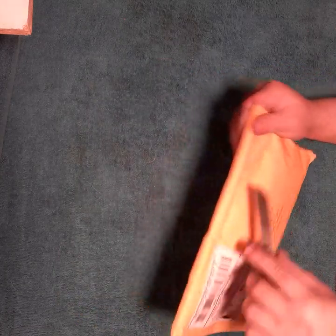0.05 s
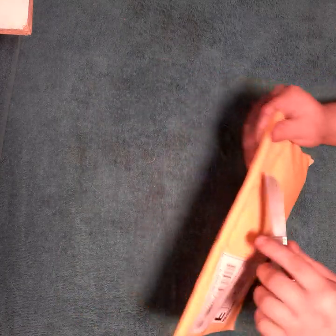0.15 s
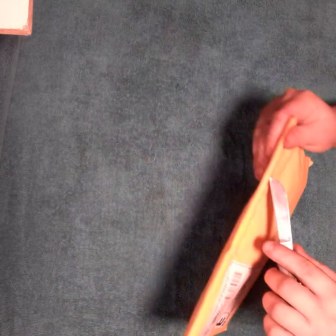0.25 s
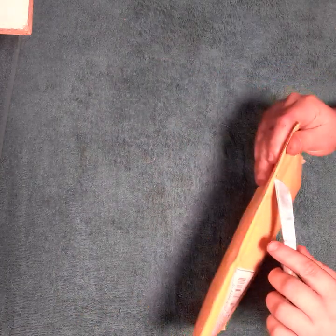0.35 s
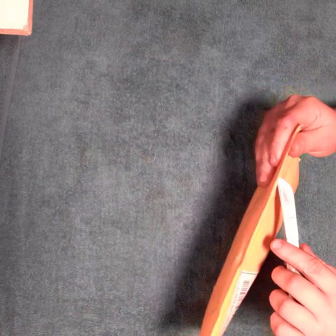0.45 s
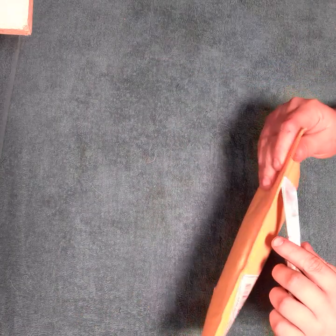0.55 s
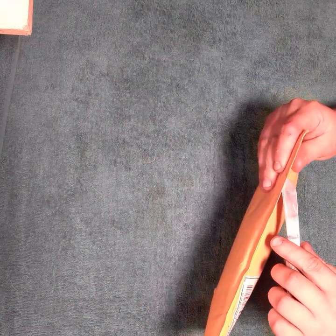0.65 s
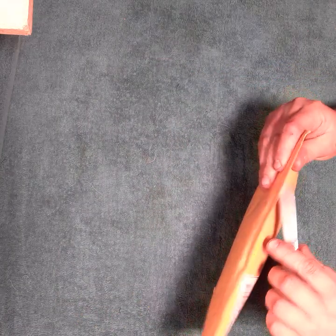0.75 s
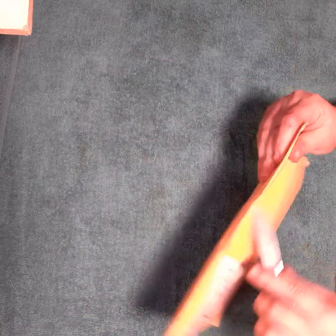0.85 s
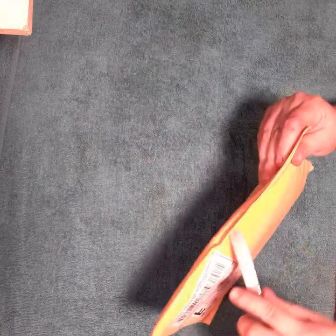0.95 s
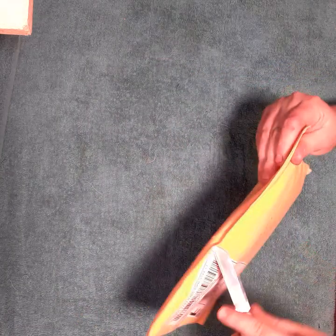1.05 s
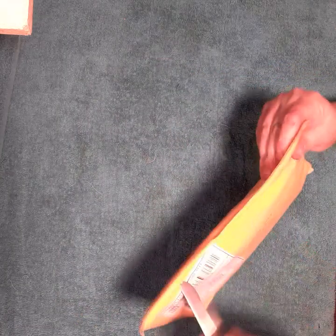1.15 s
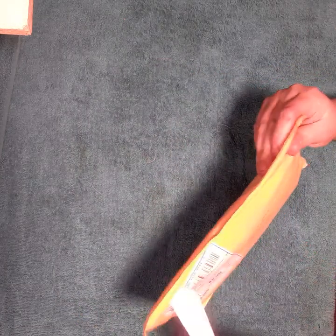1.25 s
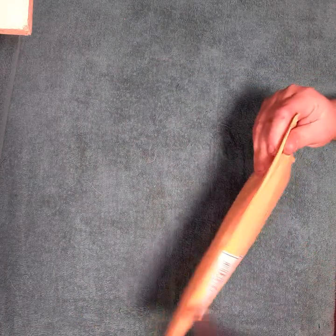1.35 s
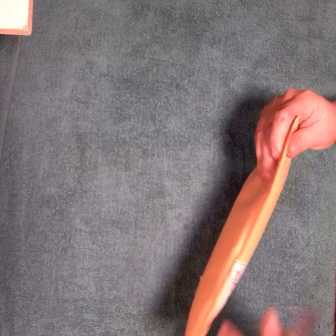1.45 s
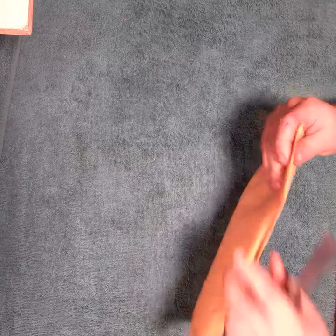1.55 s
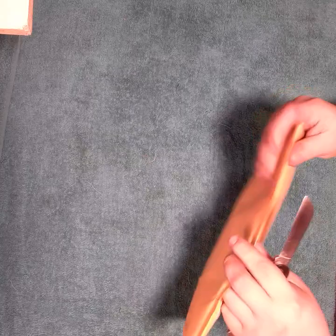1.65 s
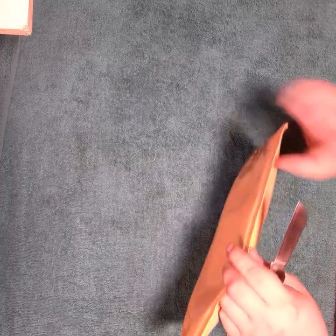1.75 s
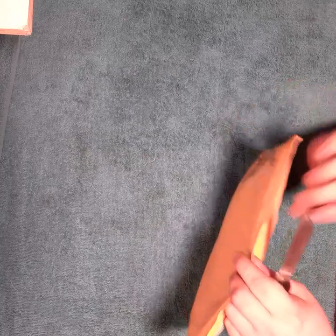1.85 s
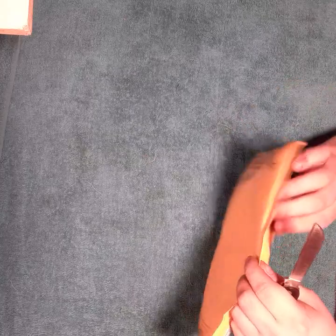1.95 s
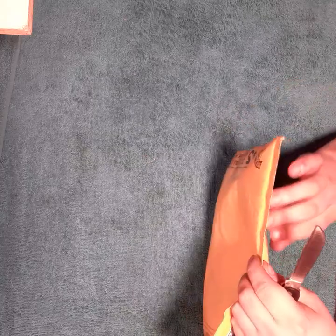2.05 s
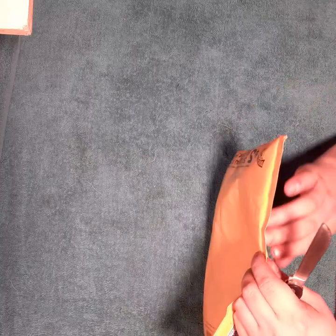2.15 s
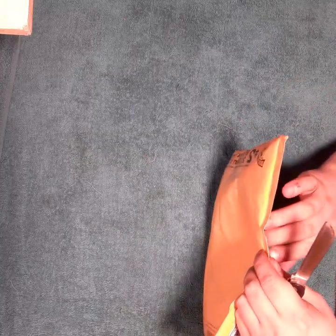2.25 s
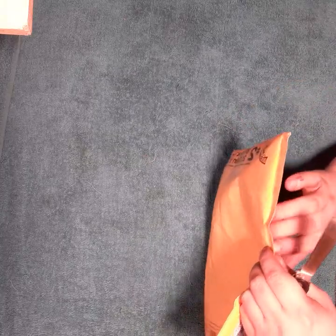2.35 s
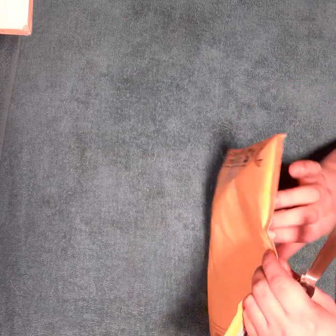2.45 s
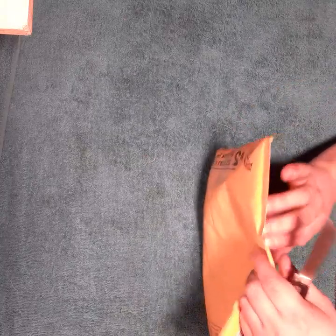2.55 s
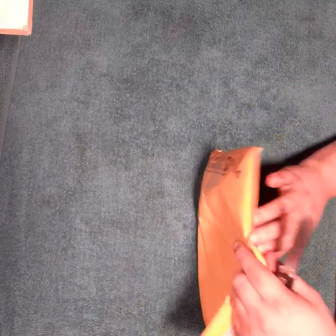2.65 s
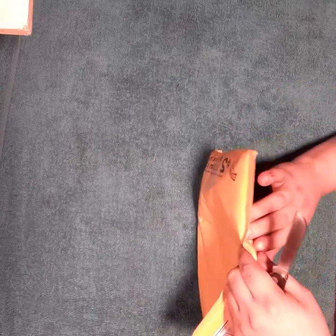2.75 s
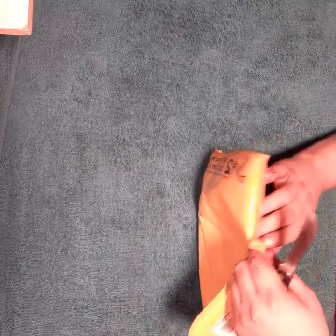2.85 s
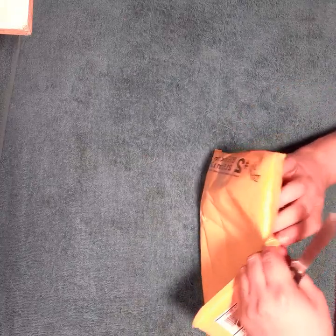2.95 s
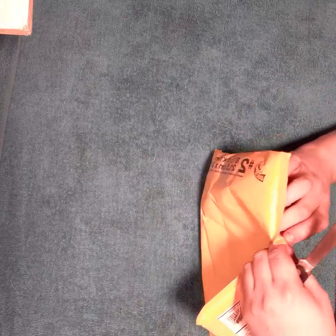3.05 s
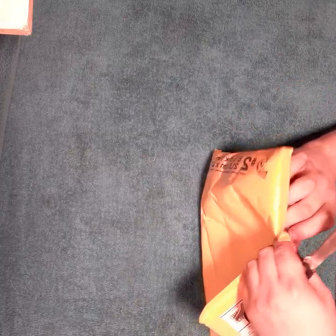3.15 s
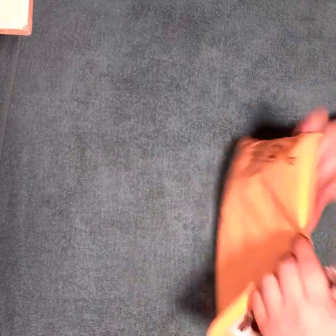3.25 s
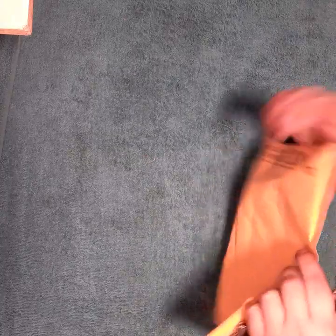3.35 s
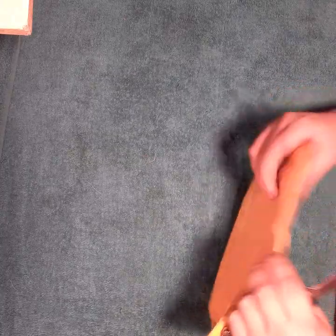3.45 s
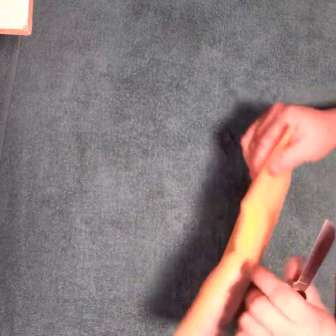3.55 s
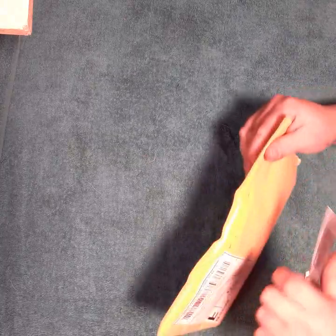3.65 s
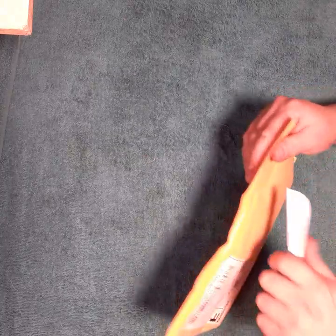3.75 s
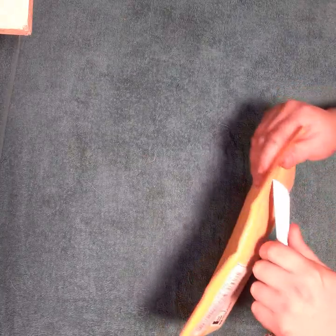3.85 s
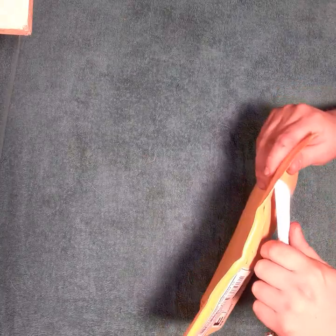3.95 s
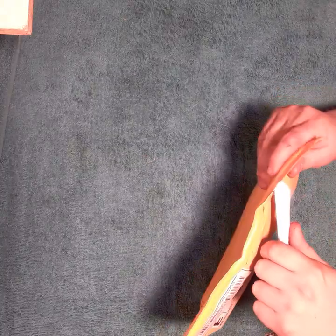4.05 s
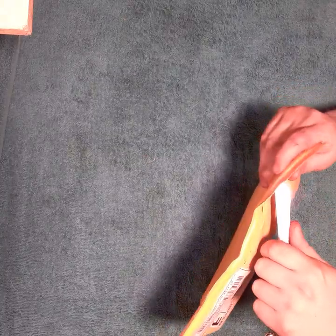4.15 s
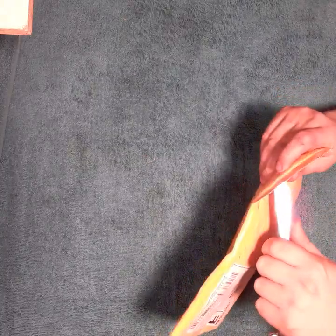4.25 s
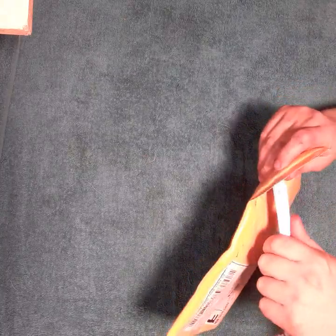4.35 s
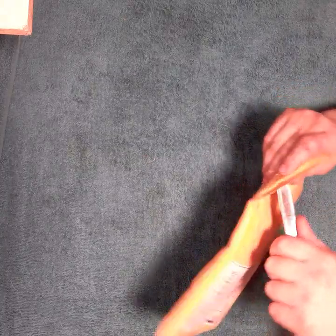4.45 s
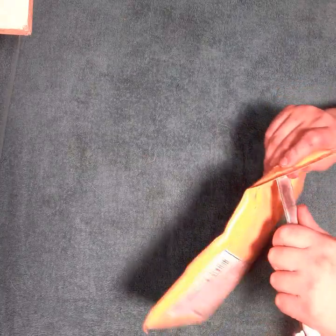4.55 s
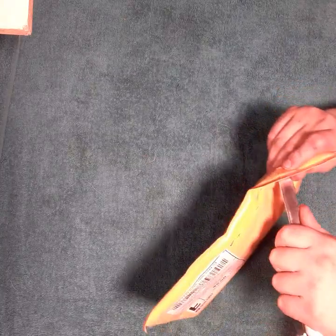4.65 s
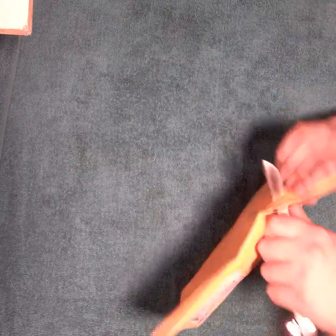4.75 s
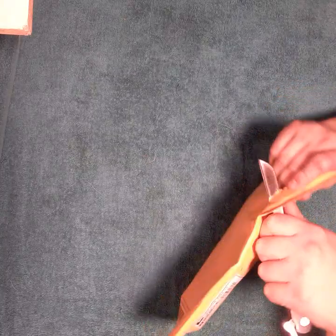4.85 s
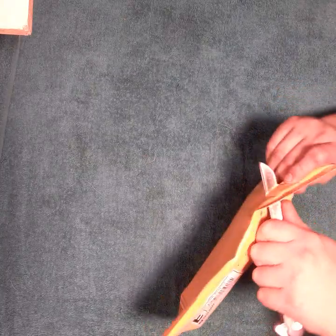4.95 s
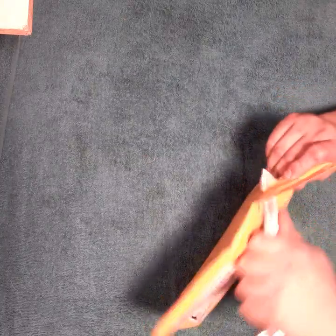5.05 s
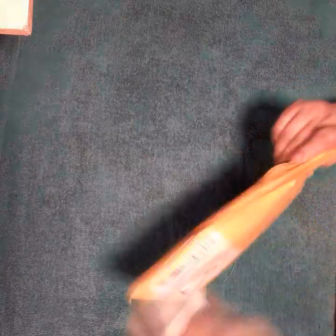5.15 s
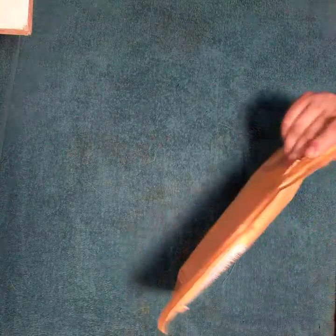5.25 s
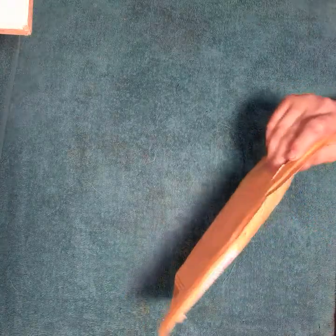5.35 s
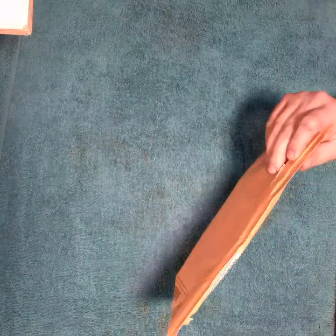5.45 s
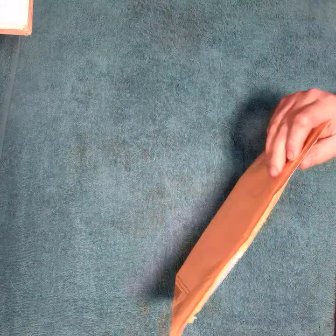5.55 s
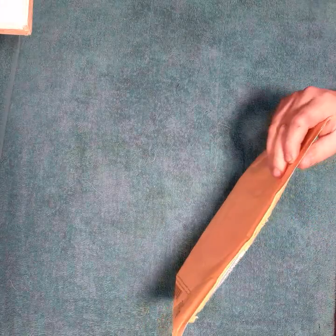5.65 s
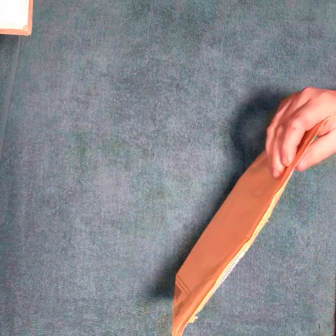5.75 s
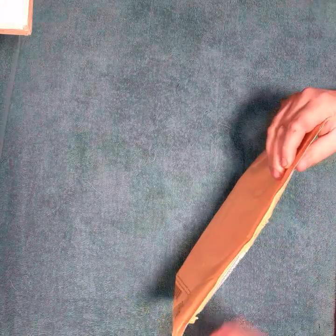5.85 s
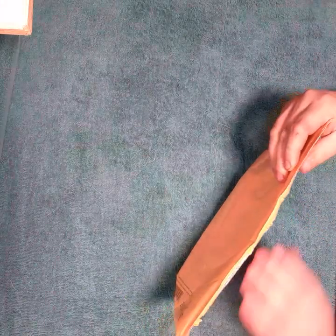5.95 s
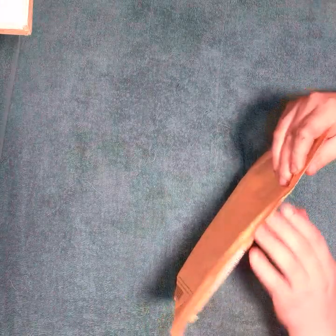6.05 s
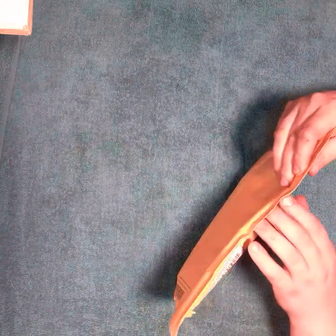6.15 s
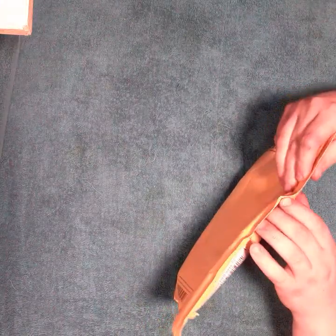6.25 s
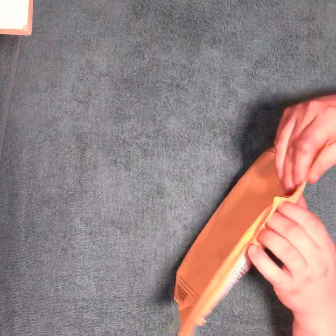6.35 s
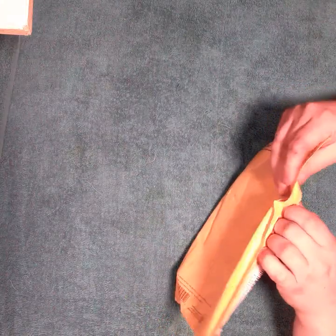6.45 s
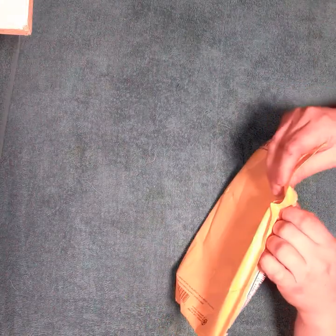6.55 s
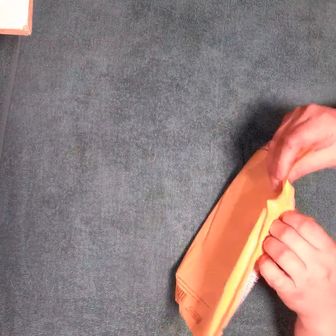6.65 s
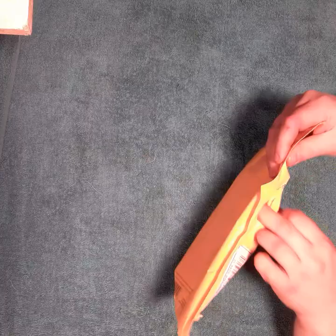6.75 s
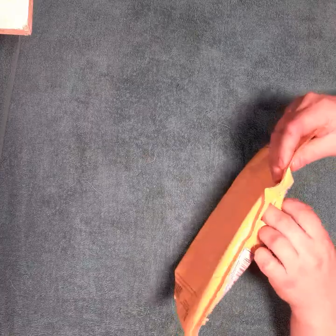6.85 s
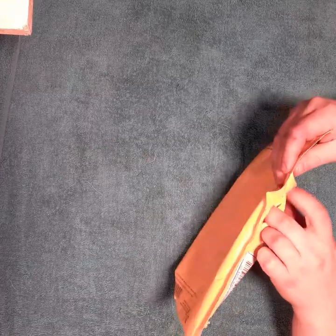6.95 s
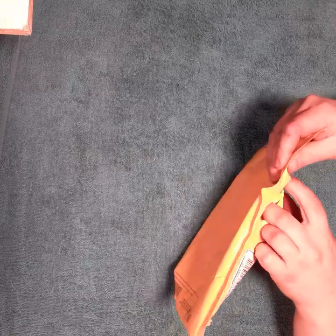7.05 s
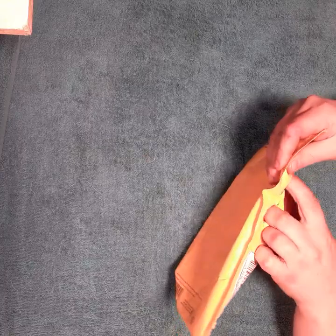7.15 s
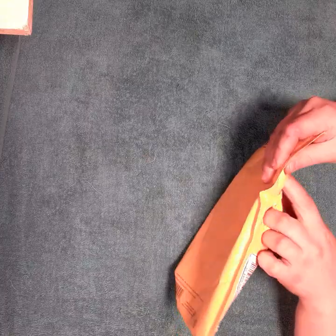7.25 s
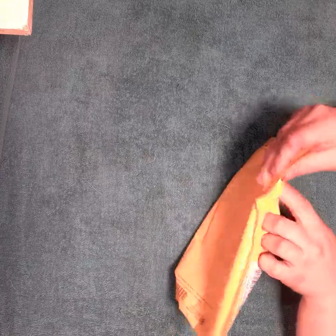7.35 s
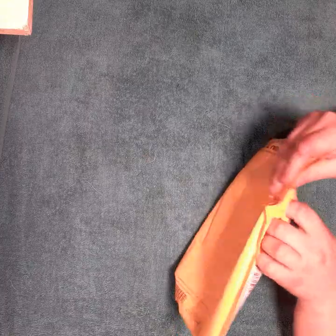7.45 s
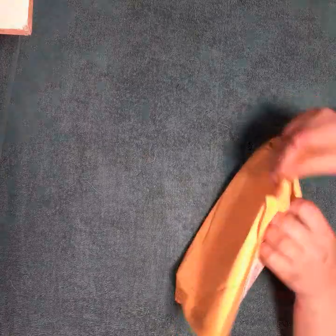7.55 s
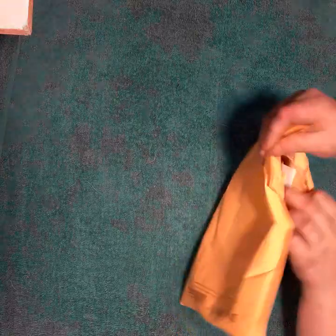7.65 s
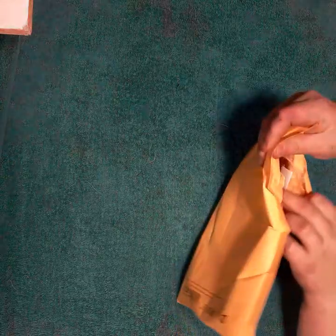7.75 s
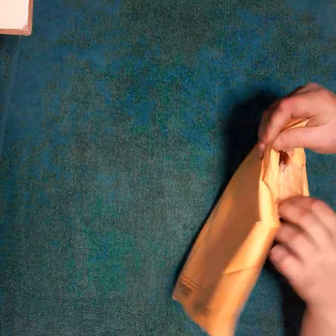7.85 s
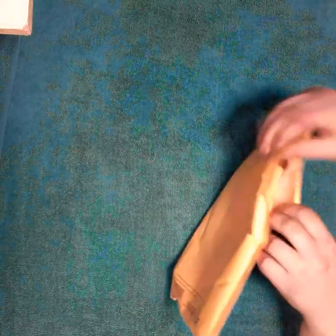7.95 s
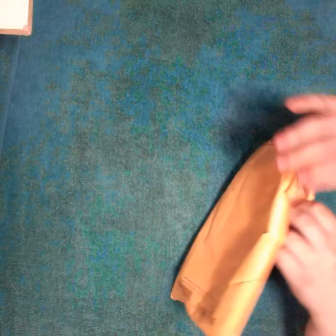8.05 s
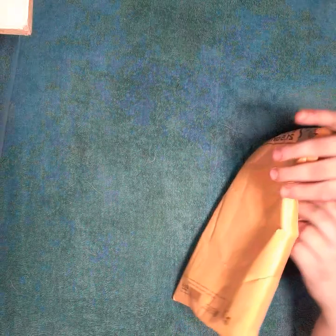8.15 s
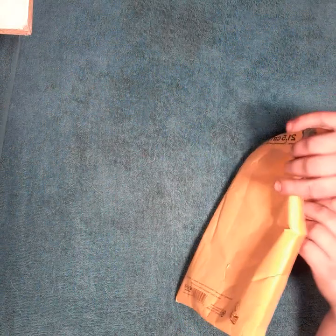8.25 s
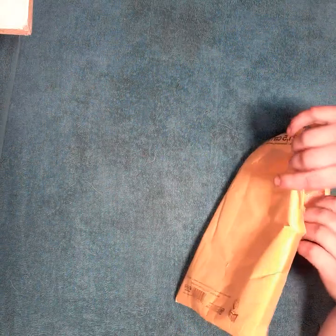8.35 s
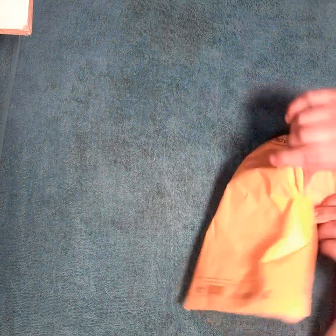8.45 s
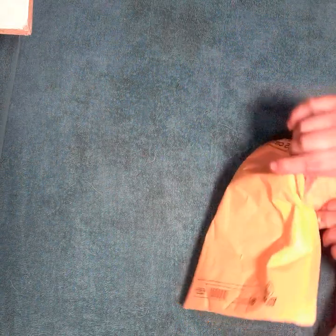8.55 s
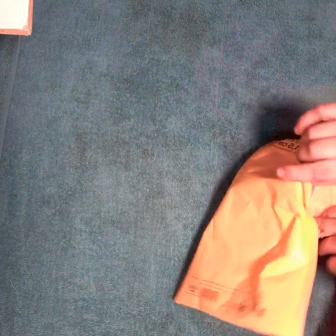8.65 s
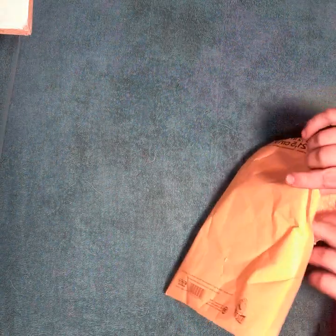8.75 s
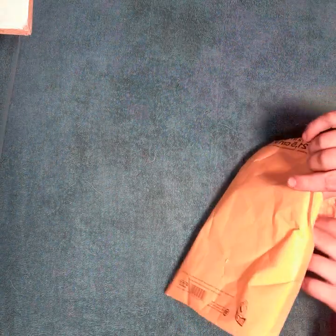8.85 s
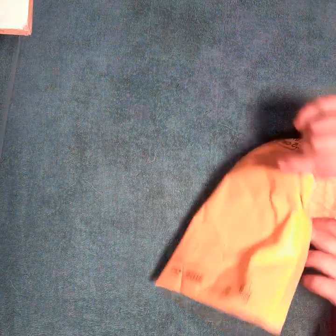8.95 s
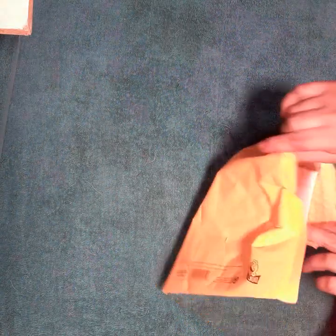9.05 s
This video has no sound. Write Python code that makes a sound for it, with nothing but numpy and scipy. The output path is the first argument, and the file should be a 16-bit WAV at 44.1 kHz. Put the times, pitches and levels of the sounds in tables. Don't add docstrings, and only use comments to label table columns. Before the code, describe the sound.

A padded paper mailer is slit and handled up close, with crisp crackles, sharp rips, plastic fizz and soft thuds in a quiet small room.

```python
import sys
import numpy as np
from scipy import signal
from scipy.fft import rfft, irfft, next_fast_len
from scipy.io import wavfile
from scipy.ndimage import map_coordinates

SR = 44100
rng = np.random.default_rng(int(sys.argv[2]) if len(sys.argv) > 2 else 0)


def persist_wave(psi):
    counts = np.round(np.clip(psi, -1, 1) * 32767).astype(np.int16)
    wavfile.write(sys.argv[1], SR, np.atleast_2d(counts).T)


def boost_factor(decibels):
    exponent = np.asarray(decibels, float) / 20
    return 10 ** exponent


N = 400869


def unit(x):
    return x / np.sqrt(np.mean(x ** 2) + 1e-20)


def along(points, hz):
    f, v = np.transpose(points)
    return np.interp(np.log(hz + 1), np.log(f + 1), v)


def filtered(x, response):
    m = next_fast_len(N + SR // 2)
    return irfft(rfft(x, m) * response(np.fft.rfftfreq(m, 1 / SR)), m)[..., :N]


def coloured(spectrum):
    return lambda hz: boost_factor(along(spectrum, hz))


def resonant(modes):
    def response(f):
        total = 0
        for k, (hz, width_hz, db) in enumerate(modes):
            damping = 1j * f * width_hz
            total = total + (-1) ** k * boost_factor(db) * damping / (hz * hz - f * f + damping)
        return total
    return response


def soft(top_hz):
    return lambda hz: 1 / (1 + 1j * hz / top_hz) ** 2


def cracks(rate, spread_db, life, smooth):
    sizes_db = spread_db * np.minimum(rng.exponential(size=N), 3.5)
    starts = (rng.random(N) < rate / SR) * boost_factor(sizes_db)
    fade = np.exp(-np.arange(SR // 20) / (life * SR))
    envelope = unit(signal.fftconvolve(starts, fade)[:N]) + smooth
    return envelope * rng.standard_normal((2, N))


def rings(s, gain, hz, cycles):
    t = np.arange(SR // 100) / SR
    fade = boost_factor(-20 * t * hz[:, None] / cycles) * np.cos(np.pi / 2 * t / t[-1])
    wave = gain[:, None] * np.sin(2 * np.pi * hz[:, None] * t) * fade
    at = np.round(s * SR).astype(int)[:, None] + np.arange(len(t))
    return np.bincount(at.ravel(), wave.ravel(), N + SR)[:N]


# release_s, lining_db, fall_s, paper_over_lining_db
RELEASES = [(.929, -26.5, 0.027, -1), (.977, -46, .04, -5), (1.013, -38, 0.027, 8), (1.56, -62, 0.12, 20),
            (1.653, -35.5, 0.074, -0.5), (2.398, -28, 0.044, -26), (3.183, -48, 0.035, -9),
            (3.468, -40.5, 0.033, -1), (4.6963, -30, 0.18, -6), (6.019, -48, .08, -17),
            (6.704, -40.5, 0.17, 6.5), (8.41, -27, 0.063, 4), (8.998, -23.5, 0.038, 7)]
STICK_S = 0.02
FROM_REST = 0.23


def swells(s, db, rise, fall, rest_db, stick=0):
    step = np.arange(0, N, 64)
    t = step / SR
    for release, *_ in RELEASES:
        t[(t > release - stick) & (t < release)] = release - stick
    t = t[:, None] - s
    early = np.maximum(-t, 0) / np.maximum(rise, 0.002)
    late = np.maximum(t, 0) / np.maximum(fall, 0.002)
    level_db = db - 20 * (late + early + FROM_REST * early ** 2)
    power = (boost_factor(level_db) ** 2).sum(axis=1) + boost_factor(rest_db) ** 2
    return np.interp(np.arange(N), step, 10 * np.log10(power))


def handling():
    folds_db, sheet_db, lining_db = hand_levels()
    shared = cracks(rate=210, spread_db=3.5, life=0.013, smooth=0.67)
    worked_paper = paper(shared, folds_db, sheet_db) + crinkle(folds_db)
    return worked_paper + lining(shared, lining_db) + pouch(shared)


# peak_s, lining_db, rise_s, fall_s, paper_over_lining_db
HAND_MOVES = [(0.078, -48.5, 3.7, 0.096, -6.5), (0.3, -53.5, 0.27, 0.24, 5.5), (0.393, -53.5, 0.6, 0.049, -8),
              (0.423, -69, 0.294, 0.018, -11.1), (0.592, -52.5, 0.29, 0.21, -5),
              (0.912, -28.5, 0.16, 0.051, -2), (1.013, -32, 0.07, 0.11, 3.5),
              (1.061, -31.5, 0.027, 0.039, -3), (1.146, -22.5, 0.022, 0.053, 5.5),
              (1.268, -40, 0.042, 0.18, -9), (1.422, -49.5, 0.004, 0.46, -9),
              (1.668, -39.5, 0.24, 0.76, -3.5), (1.853, -37, 0.058, 0.043, -9), (1.907, -42, 0.031, 0.12, 6),
              (2.009, -42.5, 0.14, 0.16, -5), (2.18, -35.5, 0.12, 0.057, -30),
              (2.273, -50.5, 0.033, 0.31, -1.5), (2.408, -38, 0.067, 0.16, -6),
              (2.611, -38.5, 0.11, 0.14, -2.5), (2.748, -36.5, 0.22, 0.057, -29),
              (2.778, -39.5, 0.017, 0.28, -6.5), (2.972, -47, 0.82, 0.11, 3.5),
              (3.128, -44, 0.58, 0.047, -1), (3.184, -36.5, 0.062, 0.29, -1),
                  (3.347, -35, 0.067, 0.029, 3), (3.473, -34.5, 0.013, 0.056, -28),
                  (3.554, -37.5, 0.36, 0.076, -4), (3.641, -48, 0.79, 0.46, -7),
                  (3.919, -50, 0.099, 0.2, 0.5), (4.121, -48, 0.16, 0.012, -6.5),
                  (4.246, -49, 0.45, 0.067, -5.5), (4.292, -52.5, 0.043, 0.18, -5.5),
                  (4.486, -43.5, 0.051, 0.19, -7), (4.61, -47, 0.034, 0.11, -4.5),
                  (4.784, -29.5, 0.025, 0.026, -2), (4.9, -55, 0.23, 0.063, 4),
                  (5.098, -35, 0.017, .06, -13), (5.14, -20, 0.04, 0.046, -5.5),
                  (5.185, -20, 0.1, 0.052, 0.5), (5.395, -50, 0.18, 0.31, -1.5), (5.53, -56, 0.01, 0.14, 7),
                  (5.7, -59, 0.97, 0.39, -15), (5.99, -61.5, 0.35, 0.048, -2.5),
              (6.067, -43, 0.069, 0.17, -7.5), (6.407, -38, 0.26, 0.3, -5),
               (6.717, -37.5, 0.26, 0.32, -4.5), (6.888, -46, 0.018, 0.71, -5),
               (7.003, -42, 0.22, 0.39, -4), (7.162, -41, 0.042, 0.019, -1.5),
               (7.193, -45.5, 0.009, 0.39, -0.5), (7.411, -31, 0.17, 0.17, -2.5),
               (7.618, -26, 0.13, 0.088, -1.5), (7.794, -53, 0.37, 0.14, 6.5),
               (7.852, -49.5, 0.021, 0.069, -30.0), (7.945, -41, 0.34, 0.33, -5.5),
               (8.292, -40.5, 0.38, 0.052, 1.5), (8.426, -30.5, 0.12, 0.14, 1),
               (8.506, -33.5, 0.45, 0.031, -40), (8.731, -41, 0.17, 0.27, -3.5),
               (9.012, -30, 0.18, 0.35, -4.5)]
REST_DB = -76.5
SHEET_SHARE = 0.17


def hand_levels():
    sudden = [(s, db, 0, fall, paper_db) for s, db, fall, paper_db in RELEASES]
    moves = HAND_MOVES + sudden
    s, db, rise, fall, paper_db = np.transpose(moves)
    return [swells(s, db + share * paper_db, rise, fall, REST_DB, STICK_S) for share in (1, SHEET_SHARE, 0)]


# freq_hz, density_db_per_hz
PAPER = [(350, -12), (600, -5), (714, -10), (874, -9.5), (953, 0.5), (1650, -4), (1780, 0.5), (2970, -0.5),
         (6000, -12.5), (7800, -20.5), (13200, -120)]
SHEET_HZ = 2300


def paper(shared, folds_db, sheet_db):
    whole = filtered(shared, coloured(PAPER))
    folds = filtered(whole, lambda hz: 1 / (1 + (hz / SHEET_HZ) ** 4))
    return boost_factor(folds_db - 2.5) * unit(folds) + boost_factor(sheet_db - 5.0) * unit(whole - folds)


GRAIN_HZ, GRAIN_SPREAD, GRAIN_CYCLES = 1656, 0.623, 3.8


def crinkle(folds_db, count=2500):
    where, pitch, size, side = rng.random((count, 4)).T
    s = where * (N - 1) / SR
    hz = GRAIN_HZ * np.exp(GRAIN_SPREAD * 2 * (2 * pitch - 1))
    size_db = -4.66 * np.log(1 - 0.98 * size)
    gain = boost_factor(folds_db[(s * SR).astype(int)] + size_db - 9.0)
    return np.array([rings(s, gain * lean, hz, GRAIN_CYCLES) for lean in (1, 1.7 * (2 * side - 1))])


# freq_hz, density_db_per_hz
LINING = [(2400, -23.5), (4000, -1), (7800, -5), (8800, 0), (10200, -2), (11900, -0.5), (15600, -8)]


def lining(shared, lining_db):
    fine = cracks(rate=610, spread_db=-14.5, life=0.0037, smooth=1.0)
    return boost_factor(lining_db + 2.5) * unit(filtered(0.7 * shared + fine, coloured(LINING)))


def pouch(shared):
    own = cracks(rate=60, spread_db=7, life=0.0034, smooth=0.92)
    flex = filtered(shared + own, soft(top_hz=500))
    pouch_db = weight()[1]
    return boost_factor(pouch_db + 2.0) * unit(squeezed(flex))


# freq_hz, width_hz, level_db
POUCH = [(213, 36, -1.5), (352, 43, 3), (444, 150, -4), (587, 57, 5.5)]
SQUEEZE, SQUEEZE_PER_S = 0.091, 3.5


def squeezed(push):
    knots = rng.standard_normal(int(N / SR * SQUEEZE_PER_S) + 4)
    wander = map_coordinates(knots, [np.arange(N) * SQUEEZE_PER_S / SR])
    grip = np.pi / 4 * (1 + np.tanh(1.5 * wander))
    slack = filtered(push, lambda hz: resonant(POUCH)(hz * (1 + 0.5 * SQUEEZE)))
    tight = filtered(push, lambda hz: resonant(POUCH)(hz * (1 - 0.5 * SQUEEZE)))
    return np.cos(grip) * slack + np.sin(grip) * tight


# peak_s, level_db, rise_s, fall_s
TEARS = [(.368, -33.5, 0.11, 0.048), (1.143, -8, 0.023, 0.03), (1.285, -32.5, 0.081, 0.13),
         (2.172, -23, 0.017, 0.06), (5.144, -12, 0.024, 0.093), (5.196, -9, 0.06, 0.026),
         (5.53, -37, 0.014, 0.095), (8.43, -33, 0.039, 0.039), (8.502, -18.5, 0.014, 0.014),
         (9.009, -2.5, 0.011, 0.012), (9.044, -16.5, 0.013, 0.021)]


def tears():
    gain = boost_factor(swells(*np.transpose(TEARS), rest_db=-120, stick=STICK_S))
    fibres = cracks(rate=570, spread_db=6, life=0.0013, smooth=0.6)
    return boost_factor(-7.5) * gain * unit(filtered(fibres, coloured(PAPER)))


# start_s, peak_db, pitch_hz, bright_db
CREASE_SNAPS = [(0.705, -30.5, 1150, -56), (.847, -23, 3400, -9), (.875, -14.5, 960, -21),
                (0.909, -19, 3280, -23), (0.929, -20.5, 1370, -20), (0.977, -14.5, 630, -20),
                (1.009, -12.5, 2940, -11.5), (1.06, -23.5, 1010, -6), (1.123, -19, 1150, -47),
                (1.139, -6, 1460, -42), (1.262, -22, 2140, -27), (1.303, -15.5, 2560, -40),
                (1.576, -31.5, 2160, -24), (1.652, -23, 1000, -14.5), (1.658, -18.5, 1170, -20),
                (1.687, -22, 1090, -19), (1.805, -24.5, 2060, -20.5), (1.9, -31.5, 1080, -4),
                (1.929, -24.5, 650, -18), (1.953, -25.5, 950, -19), (2.003, -12, 1870, -47),
                (2.032, -17, 2220, -52), (2.4, -21.5, 970, -29),
                (2.885, -18, 1390, -41), (3.181, -12.5, 1450, -15), (3.201, -14.5, 3850, -19),
                (3.235, -23.5, 1080, -30), (3.465, -24, 1130, -5), (3.546, -15, 605, -14.5),
                (3.729, -25.5, 700, -19), (3.929, -34, 2220, -16), (4.475, -42, 3820, 2),
                (4.496, -24.5, 805, -28), (4.539, -27.5, 1060, -26), (4.6965, -29, 3860, -6),
                (4.716, -26.5, 574, -4), (4.782, -17.5, 900, -15), (4.808, -22.5, 1460, -30.5),
                (4.877, -25.5, 1140, -33), (5.093, -27.5, 2060, -3), (5.133, -12.5, 2890, -9.5),
                (5.18, -6, 1390, -13), (5.193, -6.5, 590, -37), (5.528, -28.5, 1610, -30),
                (6.018, -46, 3120, -6), (6.281, -36.5, 1160, -6), (6.368, -31, 900, -5.5),
               (6.395, -20, 3200, -27), (6.653, -18, 970, -21), (6.706, -11.5, 3120, -29),
               (6.779, -23, 1070, -13.5), (6.924, -22, 1350, -22), (7.15, -33, 2470, -26),
               (7.383, -16.5, 2160, -24), (7.551, -27.5, 985, -4.5), (7.586, -18, 2430, -8.5),
               (7.656, -14.5, 2380, -30.5), (7.893, -23, 1900, -29), (8.411, -24, 2800, -27),
               (8.426, -10, 1200, -12), (8.446, -11, 550, -20), (8.501, -13.5, 650, -12),
               (8.995, -13, 1020, -22), (9.002, -13, 2220, -3), (9.043, -24.5, 1830, 0.5)]
SNAP_T60_S, FIRST_CRACK, FIRST_T60_S = 0.037, 0.51, 0.0053
CREASE_WIDTH, SHEET_DB = 0.58, -7
KNOCK_DB, KNOCK_PER_BRIGHT = -17, 0.34


def snaps():
    crease, tick, knock = np.zeros((3, 2, N + SR))
    t = np.arange(SR // 8) / SR
    grid = np.fft.rfftfreq(len(t), 1 / SR)
    fade = boost_factor(-60 * t / SNAP_T60_S)
    rise = (1 - np.exp(-t / 0.0003)) * (1 + FIRST_CRACK * boost_factor(-60 * t / FIRST_T60_S))
    first_break = 1 + 3 * boost_factor(-60 * t / 0.001)
    for s, db, hz, bright_db in CREASE_SNAPS:
        at = slice(round(s * SR), round(s * SR) + len(t))
        burst = fade * rng.standard_normal((3, 2, len(t))) * [[1.1], [0.7]]
        fold = resonant([(hz, CREASE_WIDTH * hz, 0), (2000, 3200, SHEET_DB)])(grid)
        fold = fold * soft(top_hz=3500 + 1.5 * hz)(grid)
        buckle = irfft(rfft(burst[0] * rise) * fold, len(t))
        pouch_db = KNOCK_DB + KNOCK_PER_BRIGHT * bright_db
        crease[:, at] += boost_factor(db - 2.0) * buckle / np.abs(buckle[0]).max()
        tick[:, at] += boost_factor(db + bright_db + 6.0) * burst[1] * first_break
        knock[:, at] += boost_factor(db + pouch_db + 25.5) * burst[2]
    boom = filtered(filtered(knock, soft(top_hz=900)), resonant(POUCH))
    return crease[:, :N] + filtered(tick, coloured(LINING)) + boom


# start_s, peak_db, pitch_hz
CLICKS = [(0.783, -28, 1900), (0.877, -14.5, 1120), (0.894, -24, 2190), (0.911, -4, 2900),
          (0.9295, -5.5, 3300), (0.977, -27, 662), (1.01, -13, 2920), (1.059, -10, 1060),
          (1.062, -14, 2060), (1.129, -8.5, 1340), (1.28, -31, 2220), (1.427, -31, 2960),
          (1.599, -29, 1930), (2.033, -16, 2000), (2.167, -28, 1830), (2.272, -38, 1980), (2.401, -36, 950),
          (2.788, -28, 4580), (2.887, -34, 1380), (2.924, -27, 929), (2.944, -29.5, 969),
          (3.111, -30.5, 610), (3.182, -10, 1380), (3.203, -13, 3420), (3.235, -21, 1110),
          (3.294, -25, 960), (3.965, -26, 1850), (4.238, -27, 3800), (4.311, -28, 2860), (4.604, -36, 3020),
          (4.6965, -7.5, 4220), (5.078, -34, 2160), (5.138, -10.5, 2910), (5.144, -2.5, 2530),
          (5.162, -3.5, 1500), (5.186, -17, 640), (5.193, -14, 646), (5.201, -7, 2070), (5.395, -33.5, 931),
          (6.074, -28, 2860), (6.394, -26, 3090), (6.419, -36, 1080), (6.455, -33, 2090), (6.534, -28, 955),
          (6.552, -24, 3100), (6.654, -46, 950), (6.708, -5, 2640), (6.879, -42, 2880),
          (6.932, -20.5, 1400), (7.194, -25, 3230), (7.484, -24, 1950), (7.985, -20.5, 2000),
          (8.5, -10, 600), (8.624, -39, 4200), (8.922, -26, 1750), (9.005, -5, 2200)]
# start_s, peak_db, pitch_hz
CRACKLE = [(0.847, -16, 4600), (0.9295, -14, 1010), (1.139, -6, 2200), (1.152, -6, 1390), (1.16, -9, 1100),
           (1.919, -25, 2140), (1.93, -23, 950), (1.954, -18, 2800), (2.0, -24, 2190), (2.0035, -20, 2300),
           (4.215, -45, 190), (5.134, -9, 1700), (5.149, -6, 2400), (5.156, -5, 2000), (5.17, -7, 2300),
           (5.18, -7, 4500), (5.742, -40, 150), (6.37, -31, 1000), (6.385, -19.5, 2230), (6.397, -24, 1250),
           (6.655, -13, 3000), (8.4115, -18, 2840), (8.427, -4, 1300), (8.444, -12, 2000),
           (8.447, -12, 546), (8.501, -9, 2010)]
CLICK_CYCLES, EDGE_CYCLES, EDGE_PITCH = 4, 1.2, 2.6


def clicks():
    s, db, hz = np.transpose(list(CLICKS) + list(CRACKLE))
    body = rings(s, boost_factor(db - 4.5), hz, CLICK_CYCLES)
    edge = rings(s, boost_factor(db - 11.5), EDGE_PITCH * hz, EDGE_CYCLES)
    return (body + edge) * [[1.2], [0.4]]


# start_s, peak_db
TICKS = [(0.9295, -6), (1.1456, -17), (1.426, -22), (1.6382, -27), (1.8238, -32), (2.356, -21),
         (2.781, -15), (3.3917, -37), (3.4715, -21), (3.635, -19), (3.79, -40), (4.351, -32), (4.56, -33),
         (4.59, -35), (4.6973, -1.5), (5.1776, -14), (7.7648, -29), (7.8481, -25), (8.0606, -37),
         (8.9241, -29)]


def ticks():
    out = np.zeros((2, N + SR))
    t = np.arange(SR // 50) / SR
    for s, db in TICKS:
        fade = boost_factor(db - 5 - 60 * t / 0.0041)
        out[:, round(s * SR):][:, :len(t)] += fade * rng.standard_normal((2, len(t)))
    return filtered(out, coloured(LINING))


# peak_s, level_db, pitch_hz, rise_s, fall_s
RUBS = [(.53, -63, 293, 0.016, 0.044), (1.05, -35, 205, 0.068, 0.13), (1.268, -44, 2100, .015, 0.035),
        (1.308, -28, 2370, 0.01, 0.015), (1.572, -37, 2050, 0.019, 0.037), (1.6, -47, 1950, .01, 0.036),
        (2.045, -42, 2300, .01, 0.04), (2.174, -38.5, 3200, 0.028, 0.056), (2.45, -43, 4500, 0.04, 0.055),
        (3.3, -39, 11500, 0.084, .06), (3.473, -25.5, 12000, 0.0095, 0.022), (3.73, -54, 563, 0.036, .05),
        (3.749, -51, 1900, 0.056, 0.023), (3.94, -49, 2330, 0.021, .05), (4.22, -58.5, 284, .02, 0.09),
        (4.64, -66, 12500, .06, .06), (5.17, -29, 363, 0.04, 0.11), (5.42, -59, 400, 0.16, 0.082),
        (5.8, -68.5, 2000, 0.45, 0.55), (6.2, -61, 303, .02, 0.039), (6.625, -39.5, 4930, 0.065, .03),
        (6.712, -41, 2470, .005, 0.049), (7.15, -45, 2420, .01, 0.049), (8.0, -45, 1900, 0.044, 0.067),
        (8.448, -34, 560, .01, 0.026), (9.008, -20, 2230, 0.013, 0.012)]
RUB_WIDTH = 0.26


def rubs():
    out = np.zeros((2, N + SR))
    t = np.arange(-SR // 4, SR // 2) / SR
    grid = np.fft.rfftfreq(len(t), 1 / SR)
    for s, db, hz, rise, fall in RUBS:
        fold = resonant([(hz, RUB_WIDTH * hz, 0)])(grid) ** 2
        band = irfft(rfft(rng.standard_normal((2, len(t)))) * fold, len(t))
        swell = boost_factor(db - 20 * np.where(t < 0, -t / max(rise, 0.002), t / max(fall, 0.002)))
        out[:, round(s * SR):][:, :len(t)] += swell * unit(band)
    return out[:, SR // 4:][:, :N] * [[1.2], [0.7]]


# peak_s, thud_db, fall_s, pouch_over_thud_db
THUDS = [(0.1, -66.5, 0.44, 6), (0.362, -64, 0.13, -10), (0.538, -54.5, 0.096, -8), (0.882, -40.5, 0.28, 4),
         (1.044, -35, 0.1, 0), (1.148, -37.5, 0.12, -4), (1.307, -42, 0.059, -3), (1.635, -62, 0.61, 0),
         (1.873, -50.5, 0.21, -1.5), (2.094, -60, 0.32, -13), (2.412, -61, 0.23, 3.5),
         (2.643, -64, 0.348, 9.5), (2.908, -75, 0.8, 13), (3.188, -42, 0.08, -5), (3.327, -41, 0.1, -4),
         (3.462, -43, 0.083, -3.5), (3.549, -40.5, 0.072, 4.5), (4.229, -51.5, 0.089, -14),
         (4.52, -69.5, 0.245, 6.5), (4.723, -45, 0.13, -6),
         (5.146, -32.5, 0.13, 0.5), (5.397, -53.5, 0.11, -7), (5.542, -48, 0.052, 2.5),
              (5.748, -52, 0.11, -14), (5.938, -67, 0.256, -15), (6.21, -66, 0.37, -7),
              (6.43, -59.5, 0.58, 1), (6.711, -41, 0.13, -7), (7.031, -57, 0.21, -5), (7.43, -41, 0.15, -6),
              (7.606, -37.5, 0.1, -9.5), (7.938, -59.5, 0.49, -1), (8.201, -61.5, 1, 4),
              (8.438, -37, 0.13, -2), (8.731, -49.5, 0.11, -3), (9.021, -41.5, 0.17, -15)]
THUD_RISE, STILL_DB = 0.27, -88


def weight():
    s, db, fall, pouch_db = np.transpose(THUDS)
    return [swells(s, level, THUD_RISE * fall, fall, STILL_DB) for level in (db, db + pouch_db)]


# freq_hz, width_hz, level_db
FLOOR = [(56.7, 5.3, 3.5), (128.6, 25, 1)]
SLOWEST_HZ = 48.5


def thuds():
    push = filtered(cracks(rate=59, spread_db=-7.5, life=0.0028, smooth=3.7), soft(top_hz=151))
    push = filtered(push, lambda hz: (1j * hz / SLOWEST_HZ / (1 + 1j * hz / SLOWEST_HZ)) ** 4)
    return boost_factor(weight()[0] + 2.0) * unit(filtered(push, resonant(FLOOR)))


# start_s, level_db
BOOMS = [(0.076, -50), (.84, -47), (1.29, -56), (3.31, -48), (3.721, -65), (4.21, -66), (5.3, -60),
         (5.742, -51.5), (5.96, -62), (6.7, -57), (7.37, -51), (8.499, -51)]
# freq_hz, level_db, t60_s
BOOM_MODES = [(57, 1, 0.85), (71.2, 5.5, 0.34), (117.4, -1.5, 0.33)]
BOOM_RISE_S = 0.013


def booms():
    out = np.zeros(N + SR)
    t = np.arange(SR) / SR
    ring = sum(boost_factor(db - 60 * t / t60) * np.sin(2 * np.pi * hz * t) for hz, db, t60 in BOOM_MODES)
    ring = ring * (1 - np.exp(-t / BOOM_RISE_S))
    for s, db in BOOMS:
        out[round(s * SR):][:SR] += boost_factor(db) * ring
    return out[:N] * [[1.4], [0.1]]


# freq_hz, t60_s
ROOM = [(200, 0.15), (2000, 0.071), (10000, 0.018)]


def room(x):
    hz, t, z = signal.stft(rng.standard_normal((2, SR // 2)), SR, nperseg=256)
    fade = boost_factor(-60 * t / along(ROOM, hz)[:, None])
    tail = signal.istft(z * fade, SR, nperseg=256)[1]
    delayed = np.pad(x, ((0, 0), (150, 0)))
    return signal.fftconvolve(delayed, tail / np.linalg.norm(tail[0]), axes=1)[:, :N]


# freq_hz, density_db_per_hz
AIR = [(88, -31), (150, -9), (900, -6), (1250, -14), (1700, -18), (1980, -1.5), (2500, -4), (15500, -24)]
AIR_DB = -69.5


def air():
    return boost_factor(AIR_DB + 2.5) * unit(filtered(rng.standard_normal((2, N)), coloured(AIR)))


# freq_hz, correlation
ALIKE = [(60, 0.94), (180, 0.93), (550, 0.58), (1650, 0.28), (4970, 0.12), (15000, -0.11)]
# freq_hz, level_db
LEAN = [(60, 5.5), (240, 2.3), (700, 0), (2500, 1.5), (15000, 0.1)]


def ports(pair):
    def shares(hz):
        turn = np.arccos(np.clip(along(ALIKE, hz), -1, 1)) / 2
        return np.array([np.cos(turn), np.sin(turn)])
    mid, side = filtered(pair, shares)
    return filtered(np.array([mid + side, mid - side]), lambda hz: boost_factor(along(LEAN, hz) * [[0.5], [-0.5]]))


def scene():
    mailer = handling() + tears() + snaps() + clicks() + ticks() + rubs()
    mailer = mailer + thuds() + booms()
    return ports(mailer + boost_factor(-13.0) * room(mailer) + air())


def low_pass(x):
    return signal.sosfilt(signal.butter(12, 16030, fs=SR, output="sos"), x)


MIC_LOW_HZ, TOP_HZ = 38, 15850


def record(dry):
    rounded = dry / (1 + np.abs(dry / 0.9) ** 3) ** (1 / 3)

    def band(hz):
        bass_cut = (1j * hz / MIC_LOW_HZ / (1 + 1j * hz / MIC_LOW_HZ)) ** 3
        return np.where(hz < TOP_HZ, 1, 0.006) * bass_cut
    mix = filtered(rounded, band)
    return low_pass(mix)


dry = scene()
out = record(dry)
persist_wave(out)
```